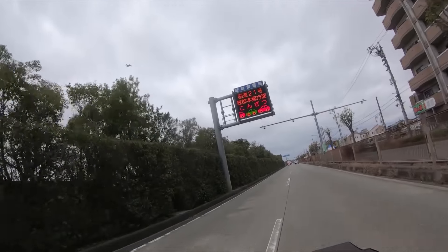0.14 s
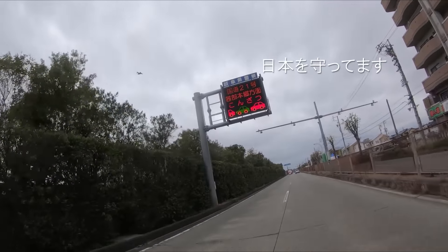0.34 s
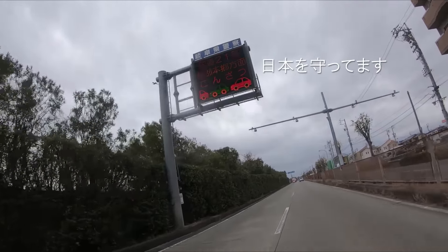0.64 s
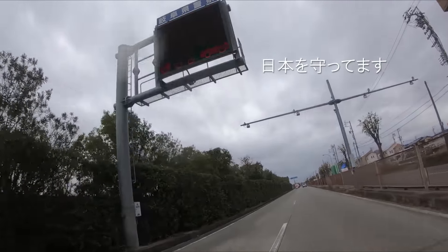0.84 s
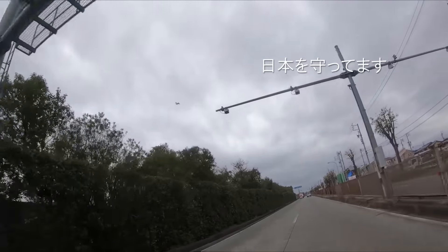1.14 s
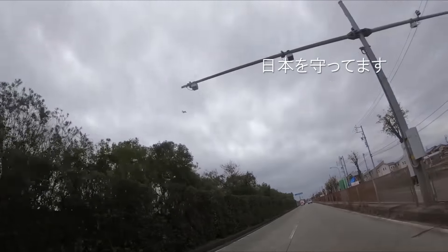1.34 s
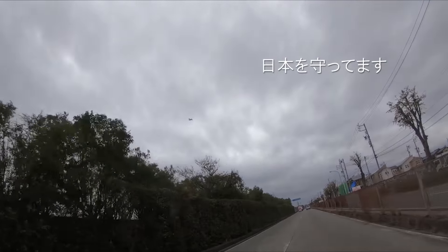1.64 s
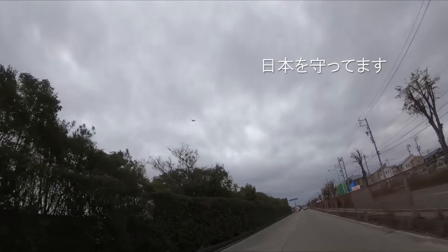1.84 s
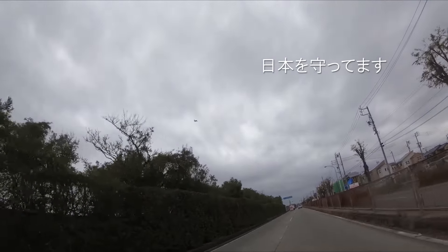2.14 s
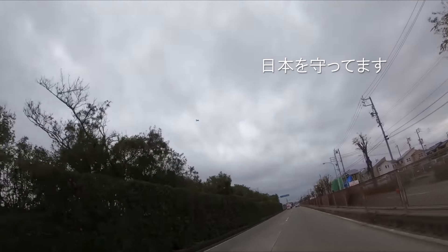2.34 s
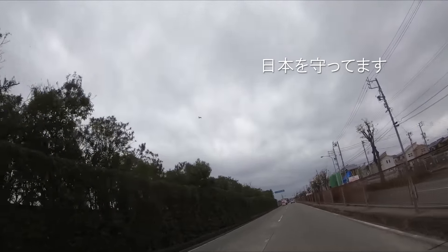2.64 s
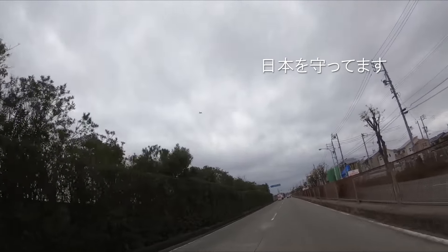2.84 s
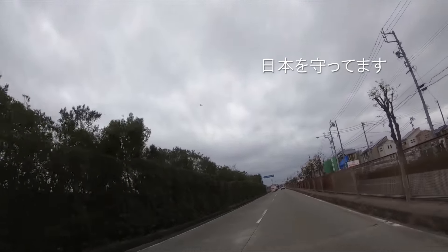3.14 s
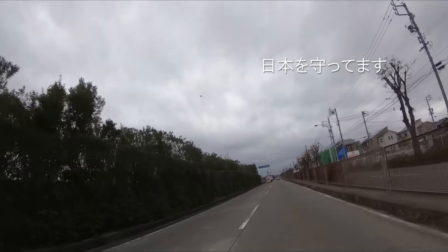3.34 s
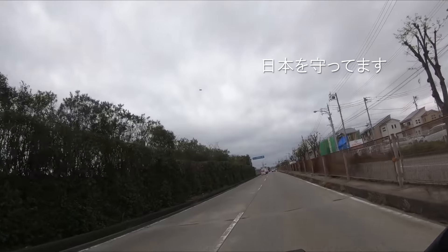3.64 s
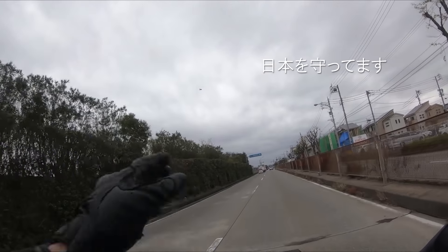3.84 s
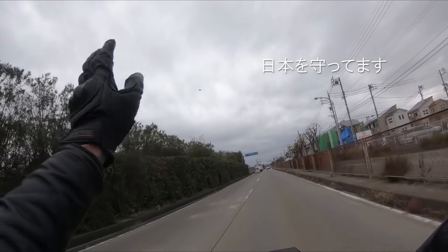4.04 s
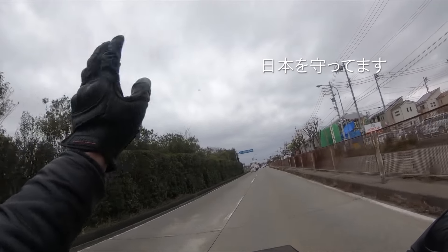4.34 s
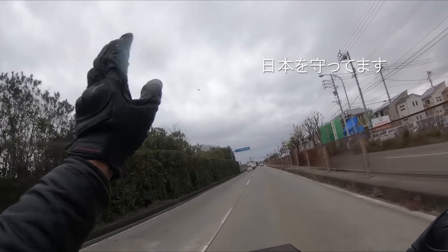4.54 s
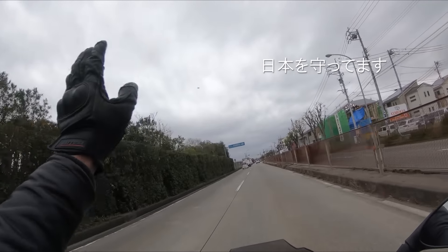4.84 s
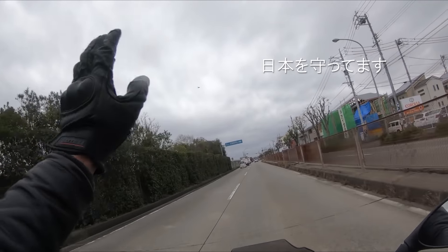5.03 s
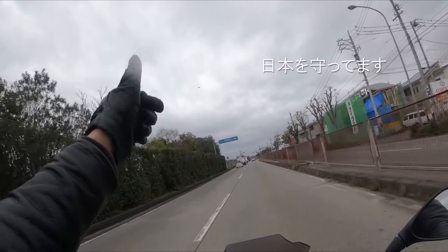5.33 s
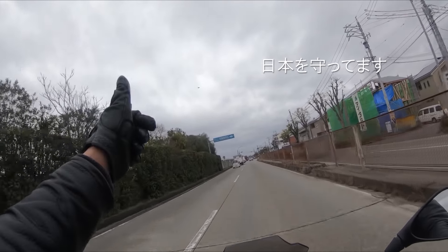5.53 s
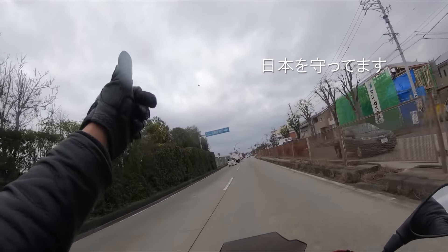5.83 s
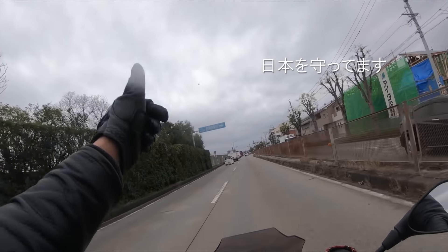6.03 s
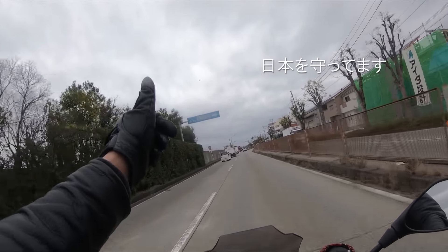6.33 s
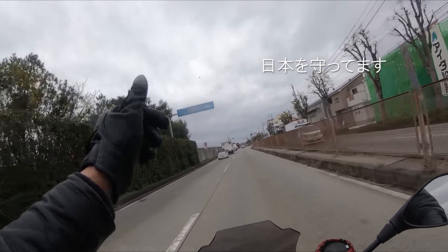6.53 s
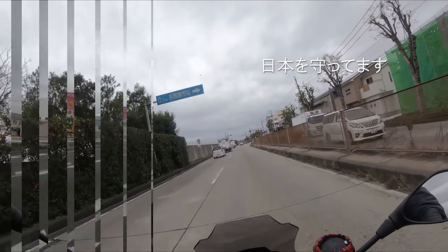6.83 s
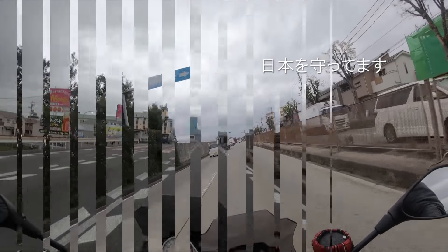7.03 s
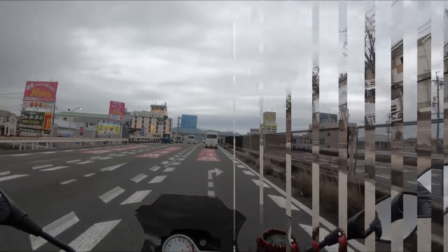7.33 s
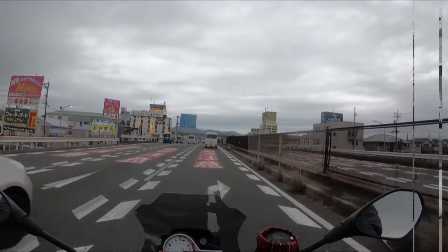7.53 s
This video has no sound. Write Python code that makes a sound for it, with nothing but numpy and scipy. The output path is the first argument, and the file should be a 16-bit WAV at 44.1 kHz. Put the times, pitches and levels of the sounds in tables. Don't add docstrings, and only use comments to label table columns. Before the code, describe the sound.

Heavy jet exhaust roar with a sweeping hollow phasing colour over engine drone and helmet wind, ending suddenly with engine, tyres and wind alone.

```python
import sys
import numpy as np
from scipy import signal
from scipy.fft import rfft, irfft, next_fast_len
from scipy.io import wavfile
from scipy.ndimage import uniform_filter1d, map_coordinates

SR = 44100
rng = np.random.default_rng(int(sys.argv[2]) if len(sys.argv) > 2 else 0)


def generate_wav(signal):
    frames = np.transpose(np.atleast_2d(signal))
    scaled = np.clip(frames, -1, 1) * 32767
    pcm = np.round(scaled).astype(np.int16)
    wavfile.write(sys.argv[1], SR, pcm)


def how_loud(loudness_db):
    steps = np.asarray(loudness_db, float) / 20
    return 10 ** steps


N = 338402
TIME = np.arange(N) / SR


def rms_one(x):
    return x / np.sqrt(np.mean(x ** 2) + 1e-20)


def in_time(rows):
    s, *columns = np.transpose(rows)
    return [np.interp(TIME, s, c) for c in columns]


def at_hz(points, hz):
    point_hz, point_db = np.array(points).T[:2]
    return np.interp(np.log(hz), np.log(point_hz), point_db)


def swing(db):
    return db - db.mean()


def swells(events):
    return sum(db * 2.0 ** -(2 * (TIME - s) / length_s) ** 2 for s, db, length_s in events)


def drift(rate):
    r = np.exp(-80 * np.pi * rate / SR)
    noise = rng.standard_normal(N // 40 + 2002)
    slow = signal.lfilter([1], [1, -2 * r, r * r], noise)[2000:]
    return np.interp(np.arange(N) / 40, np.arange(len(slow)), rms_one(slow))


def bands(spectrum, count):
    size = next_fast_len(N, real=True)
    hz = np.maximum(np.fft.rfftfreq(size, 1 / SR), 1)
    inside = (hz > spectrum[0][0]) * (hz < spectrum[-1][0])
    whole = rfft(rng.standard_normal(size)) * how_loud(at_hz(spectrum, hz)) * inside
    whole = whole / np.sqrt(np.mean(irfft(whole, size) ** 2))
    centres = np.geomspace(spectrum[1][0], spectrum[-3][0], count)
    for k, centre_hz in enumerate(centres):
        share = np.interp(np.log(hz), np.log(centres), np.arange(count) == k)
        yield centre_hz, irfft(whole * share, size)[:N]


def gusty(spectrum, count, shared_db, own_db, rate):
    together = drift(rate)
    total = 0
    for _, band in bands(spectrum, count):
        total = total + band * how_loud(shared_db * together + own_db * drift(rate))
    return rms_one(total)


def gated_band(low_hz, high_hz, gate):
    sos = signal.butter(6, [low_hz, high_hz], "band", fs=SR, output="sos")
    noise = (gate + 1e-18) * rng.standard_normal(N)
    return signal.sosfilt(sos, noise) * np.sqrt(SR / 2 / (high_hz - low_hz))


def bursts(events, gain_db, decay_s, low_hz, high_hz):
    gate = 0
    for s, db in events:
        gate = gate + how_loud(db + gain_db) * np.exp(-np.abs(TIME - s - decay_s) / decay_s)
    return gated_band(low_hz, high_hz, gate)


def echo_of(x, spacing_hz, strength, sway, kind, edge_hz):
    late = np.arange(N) - SR / spacing_hz * (1 + sway * drift(8.6))
    copy = map_coordinates(x, [late], order=3, mode="mirror")
    sos = signal.butter(1, edge_hz, kind, fs=SR, output="sos")
    return np.clip(strength, 0, 1) * signal.sosfilt(sos, copy)


# centre_s, level_db, length_s
GUSTS = [(0.304, -3.5, 0.045), (0.691, 2, 0.2), (1.043, -0.5, 0.063), (1.342, 3.1, 0.064),
         (1.439, 0.5, 0.127), (1.726, 2, 0.26), (1.988, 4.5, 0.05), (2.118, 1, 0.048), (2.297, 1.4, 0.12),
         (2.539, -4.5, 0.086), (2.696, -1, 0.055), (2.851, 2.5, 0.12), (3.023, 4, 0.13),
         (3.218, -0.4, 0.11), (3.347, 1, 0.11), (3.517, -4, 0.072), (3.569, 5, 0.048), (3.954, -1, 0.16),
         (4.213, -2.5, 0.11), (4.31, 1, 0.13), (4.5, -1.5, 0.16), (4.657, -2.5, 0.087), (5.044, 2.5, 0.19),
         (5.742, 4.5, 0.089), (6.021, -7, 0.04), (6.33, -1, 0.15), (6.797, -4, 0.056)]
FLUTTER_DB, FLUTTER_PER_S = 1.35, 12.7


def eddies():
    return swells(GUSTS) + FLUTTER_DB * drift(FLUTTER_PER_S)


# time_s, body_db, top_air_loss_db, body_lean_db_per_octave, top_lean_db_per_octave
ROAR = [(0, -5, 2, -4.5, -1.5), (.4, -3.5, 0.5, 0.5, -1.5), (.9, -0.5, 2.5, 0.1, -2.5),
        (1.6, 0, 4, -0.8, -2), (2.15, 3, 7.5, 0.1, 0), (2.6, 5.5, 7, 9.5, 0.5), (3.0, 3.5, 7.5, -1, -1),
        (3.55, 0.5, 5, -0.2, -1.3), (3.8, -2, 10.5, -9, 2.5), (4.1, 0.5, 9.5, -5.5, 0.5),
        (4.4, 3.5, 8, -2.5, 3.5), (5.0, 0, 8.5, 1, -1), (5.2, 1, 8, 5, -1.5), (5.5, 1, 12, -7, 0.5),
        (6.0, 0.5, 18, 6, 2), (6.5, 0.5, 25, 2.5, -6), (7.19, 0, 21, 3.5, -1)]
# pitch_hz, density_db_per_hz
ROAR_COLOUR = [(65, -32), (110, -6.5), (134, -9.5), (230, 0.5), (276, 1.5), (343, -8), (420, -10),
               (693, -14.5), (1000, -21.5), (1400, -28.5), (1800, -32), (2390, -31.5), (6000, -60),
               (7800, -82), (13200, -120)]
# time_s, comb_spacing_hz, low_strength_0_to_1, high_strength_0_to_1
ROAD_ECHO = [(0, 219.6, 0.3, 0.4), (.5, 217.3, .2, 0.2), (.85, 225.8, .22, .25), (1.3, 227, .3, 0.5),
             (1.7, 242, 0.4, .35), (2.1, 249.3, 0.5, 0.4), (2.6, 257, 0.5, .35), (3.1, 270.8, 0.4, 0.5),
             (3.55, 273, .4, 0.1), (3.85, 285.3, 0.8, 0.2), (4.3, 295, 0.4, .55), (4.7, 303, 0.4, 0.3),
             (5.0, 316, .45, 0.6), (5.35, 321, 0.2, 0.1), (5.9, 332, 0.79, 0.4), (6.4, 328.6, .45, .15),
             (6.8, 332.5, .7, 0), (7.2, 354, 0.6, .15)]
# time_s, comb_spacing_hz, strength_0_to_1
SHOULDER_ECHO = [(0, 494, 0.04), (1.0, 523, 0.1), (2.2, 616, 0), (2.6, 548, 0.2), (4.2, 496, 0),
                 (5.197, 439, 0.29), (7.2, 486, 0)]
# time_s, edge_hz, depth_db, reach_octaves
SHADOW = [(0, 840, -1, 0.7), (.25, 853, -2, 0.79), (.6, 1024, -6.5, 0.92), (1.3, 902, -9, 0.85),
          (2.0, 845, -12, 0.37), (2.6, 870, -15, 0.35), (3.2, 920, -17.5, .45), (3.7, 996, -8, 0.5),
          (4.2, 1035, -1, 0.46), (4.7, 1080, -6.5, 0.95), (5.2, 1195, -15, 0.49), (5.8, 1226, -8.5, 0.48),
          (6.4, 1230, -8, 0.4), (7.2, 1234, -5.5, 0.54)]
# centre_s, level_db, length_s
ROLLS = [(0.407, 3, 0.19), (0.871, 1.5, 0.198), (1.546, -0.5, 0.16), (2.25, 0, 0.34), (2.494, -0.5, 0.2),
         (3.774, -0.5, 0.07), (3.959, 2, 0.15), (4.996, -1.5, 0.15), (5.298, -2, 0.079), (5.989, 1.5, 0.13),
         (6.106, -0.5, 0.16), (6.962, 3.5, 0.1)]
# centre_s, level_db, length_s
MIDDLE_ROLLS = [(1.55, 1, 0.12), (2.8, -2.5, 0.14), (3.95, 0.5, 0.4), (4.78, 0.5, 0.091),
                (5.45, -1.5, 0.27), (6.2, -0.5, 0.91), (7.0, -0.5, 0.11)]
# centre_s, pitch_hz, level_db, length_s
PATCHES = [(.2, 396, -5.5, .7), (1.051, 385, -3, .3), (1.498, 488, 3.5, .5), (1.404, 912, -2.5, 0.55),
           (1.998, 993, -5.5, 0.55), (2.545, 307, 2.5, 0.34), (2.593, 233.6, -3, 0.52),
           (2.615, 373, -8.5, 0.62), (3.75, 397, 10, 0.36), (4.04, 495, -7.5, 0.4), (4.186, 313, -4, .5),
           (3.9, 675, -2, 0.46), (4.09, 795, 3, .8), (4.96, 231, 4.5, .3), (5.286, 863, 4, 0.36),
           (5.846, 880, -7, .9), (5.7, 1092, 5, 0.44), (6.403, 331, -2.5, .35), (6.453, 590, 7, 0.5),
           (6.904, 225, -1, .5), (6.39, 179, -7, .5), (.7, 2650, 3, 1.0), (2.2, 3000, -2.5, 1.4),
           (2.8, 4300, 6, 0.55), (3.45, 3150, 4, .3), (4.0, 1600, -5.5, .5), (5.0, 2500, -3.5, 1),
           (1.2, 2250, 4, .4), (.1, 1350, 3.5, 0.18), (0.59, 540, -2.5, .5), (1.3, 790, 3, .4),
           (1.6, 800, 2.5, .3), (2.4, 235, 3, .2), (3, 170, 2, .5), (3.3, 1650, 2.5, .6),
           (3.0, 4300, 3, .8), (4.7, 690, 3, .2), (5.15, 1000, 3, 0.28), (6.0, 1000, -3.5, .3),
           (6.9, 800, -5.5, .3), (5.4, 260, -1.5, .3), (2.7, 3300, -3, .4), (6.7, 420, -2, .5),
           (4.5, 500, -2.5, .2)]
PATCH_OCTAVES = 0.12
BODY_CLIMB_DB = 16.5
MIDDLE_LOSS_SHARE = 0.33
DUCK_MIDDLE = 0.25
TOP_FOLLOWS = 0.88
LOWS_LATE = 1.007


def roar_patches(hz):
    events = []
    for s, at_pitch_hz, db, length_s in PATCHES:
        if .7 < hz / at_pitch_hz < 1.4:
            nearness = np.exp(-(np.log2(hz / at_pitch_hz) / PATCH_OCTAVES) ** 2)
            events.append((s, db * nearness, length_s))
    return swells(events)


def jet(eddies_db):
    body_db, loss_db, lean_db, bright_db = in_time(ROAR)
    body_db, loss_db = swing(body_db), swing(loss_db)
    middle_db = -MIDDLE_LOSS_SHARE * loss_db - DUCK_MIDDLE * body_db + swells(MIDDLE_ROLLS)
    top_db = TOP_FOLLOWS * eddies_db - loss_db
    body_db = body_db + swells(ROLLS)
    edge_hz, depth_db, reach = in_time(SHADOW)
    spacing_hz, low_echo, high_echo = in_time(ROAD_ECHO)
    climb = np.log2(spacing_hz / 270)
    lows, highs = 0, 0
    for hz, band in bands(ROAR_COLOUR, count=30):
        above = np.log2(hz / edge_hz)
        top = np.clip(above / .12 + 1, 0, 1)
        body = np.clip((np.log2(480 / hz) + climb) / .54, 0, 1)
        middle = (1 - top) * (1 - body)
        tilted_body_db = body_db + (BODY_CLIMB_DB * climb + lean_db) * np.log2(hz / 270)
        tilted_top_db = top_db + bright_db * np.log2(hz / 1700)
        level_db = body * tilted_body_db + middle * middle_db + top * tilted_top_db
        shade_db = top * depth_db * np.exp(-(above / np.maximum(reach, .1)) ** 2)
        flicker_db = (0.66 + 0.32 * top) * drift(8.9)
        band = band * how_loud(level_db + shade_db + roar_patches(hz) + flicker_db)
        lows = lows + (1 - top) * band
        highs = highs + top * band
    low_spacing_hz = spacing_hz / LOWS_LATE
    bounce = echo_of(lows, low_spacing_hz, low_echo, 0.0097, "low", 3000)
    again = 0.3 * echo_of(bounce, low_spacing_hz, low_echo, .003, "low", 2000)
    high_bounce = echo_of(highs, spacing_hz * 1.012, high_echo, 0.004, "low", 4500)
    out = lows + bounce + again + highs + high_bounce
    out = out + echo_of(out, *in_time(SHOULDER_ECHO), 0.073, "high", 1200)
    return how_loud(-11.5) * rms_one(out)


# pitch_hz, density_db_per_hz
HISS = [(900, -15), (1300, 1.5), (1500, 1.5), (1640, -3.5), (2300, -0.5), (2550, -3.5), (3200, -6.5),
        (4800, -9), (5700, -14), (6800, -18), (8200, -21.5), (9400, -30), (11000, -56.5), (13000, -89.5)]
# centre_s, level_db, length_s
SURGES = [
    (0.0, 1, .15),
    (.6, -2, 0.42),
    (3.15, 1.5, 0.83),
    (5.3, 0, 1.0),
    (6.6, 1.5, 0.46),
]
HISS_DB, HISS_RISE_DB_PER_S = -43.5, 1
DUCK_HISS = 0.44
HISS_FOLLOWS = 0.55


def hiss(eddies_db):
    gain_db = swing(HISS_RISE_DB_PER_S * TIME - DUCK_HISS * in_time(ROAR)[0])
    level_db = HISS_DB + gain_db + HISS_FOLLOWS * eddies_db + swells(SURGES)
    return how_loud(level_db) * gusty(HISS, count=8, shared_db=0.97, own_db=0.5, rate=43.0)


# pitch_hz, width_hz, share
CAVITIES = [(3740, 110, -0.33), (3790, 90, 0.46), (4240, 330, -0.0084), (4770, 190, 0.47),
            (5210, 380, -0.14), (6450, 150, .4), (8000, 400, 0.24)]


def vents(sound):
    out = sound
    for hz, width_hz, share in CAVITIES:
        r = np.exp(-np.pi * min(width_hz, 500) / SR)
        peak = [(1 - r * r) / 2, 0, (r * r - 1) / 2]
        ring = [1, -2 * r * np.cos(2 * np.pi * hz / SR), r * r]
        out = out + share * signal.lfilter(peak, ring, sound)
    return out


def firing_orders(firing_hz, level_db, orders, rough_db):
    turn = 2 * np.pi * np.cumsum(firing_hz * (1 + 0.00524 * drift(3.34))) / SR
    firing_db = dict(orders)[1]
    lines = 0
    for k, db in orders:
        phase = 1.28 * rng.standard_normal()
        lines = lines - how_loud(db - firing_db + rough_db * drift(9.0)) * np.cos(k * turn + phase)
    return np.sqrt(2) * how_loud(level_db) * lines


# time_s, firing_hz, firing_line_db
ENGINE = [(0, 91.58, -21.5), (3.1, 90.53, -25), (3.4, 91.74, -22.5), (5.5, 92.74, -23.5), (7.2, 91.68, -22)]
# multiple_of_firing, level_db
ENGINE_ORDERS = [(.5, -9), (1, 5.5), (1.5, -21.5), (2, 2), (2.5, -4.5), (3, -8.5), (4, -5), (5, -6)]


def engine():
    return firing_orders(*in_time(ENGINE), ENGINE_ORDERS, rough_db=2.5)


# pitch_hz, density_db_per_hz
BUFFET = [(8.2, -35), (14, -15), (59, -6), (86, -7.5), (99, -9.5), (128, -11), (170, -8.5), (220, -26.5),
          (370, -120)]


def wind(buffet_db):
    return how_loud(buffet_db + 1.5) * gusty(BUFFET, count=4, shared_db=.8, own_db=.8, rate=6.0)


# centre_s, level_db, length_s
WIND = [(0.389, -19, 0.073), (0.711, -11, 0.12), (0.935, 2, 0.2), (1.664, 1, 0.2), (2.103, 2, 0.12),
        (2.325, -1.5, 0.171), (2.691, 3, 0.34), (3.108, -5.5, 0.27), (3.425, 4.5, 0.49), (4.278, -2, 0.36),
        (4.697, 4.5, 0.084), (4.944, 3.5, 0.15), (5.632, -0.5, 0.33), (5.767, -0.5, 0.14), (6.054, 0, 0.3),
        (6.665, 0, 0.16)]
BUFFET_DB, BUFFET_RISE_DB_PER_S = -24.5, 0.41


def buffeting():
    return wind(BUFFET_DB + BUFFET_RISE_DB_PER_S * TIME + swells(WIND))


# time_s, level_db
AIR = [(0, -84), (.5, -88), (2.6, -91), (3.5, -88), (3.85, -85.5), (5.4, -85.5), (6.5, -81.5), (7.15, -81),
       (7.25, -80), (7.68, -74)]
CEILING_HZ = [12000, 12700, 13400]


def slipstream():
    air_db = in_time(AIR)[0]
    air = gated_band(9900, 12000, how_loud(air_db + 1.2 * drift(12.0)))
    reach = drift(5.0) + TIME / 2.8 - 1.2
    for k, (low_hz, high_hz) in enumerate(zip(CEILING_HZ, CEILING_HZ[1:])):
        is_open = np.clip(4 * (reach - 1.2 * k), 0, 1)
        air = air + gated_band(low_hz, high_hz, how_loud(air_db - 11.0) * is_open)
    return air


# start_s, peak_db
SPITS = [(0.21, -72.5), (1.025, -68), (1.728, -63), (1.9016, -73.5), (4.1903, -61), (4.344, -65),
         (4.8196, -71), (5.1973, -61.5), (5.224, -53), (5.2976, -66), (5.672, -69.5), (6.3016, -67.5),
         (6.576, -70), (7.2988, -74), (7.3894, -72.5), (7.4903, -68), (7.6394, -66)]


def grit():
    return bursts(SPITS, -9.0, .008, 9500, 15700)


# time_s, pitch_hz, level_db
WHINE = [
    (.4, 1738, -37),
    (.9, 1790, -34),
    (1.6, 1852, -36),
    (2.2, 1835, -34),
    (2.8, 1812, -40.5),
    (3.3, 1746, -60),
]


def whine():
    hz, db = in_time(WHINE)
    sos = signal.butter(2, 120, fs=SR, output="sos")
    wide = signal.sosfilt(sos, rng.standard_normal((2, N)))
    turn = 2 * np.pi * np.cumsum(hz) / SR
    heard = (TIME > WHINE[0][0]) * (TIME < WHINE[-1][0])
    ridge = how_loud(db) * heard * rms_one(wide[0] * np.cos(turn) + wide[1] * np.sin(turn))
    spacing_hz, _, high_echo = in_time(ROAD_ECHO)
    return ridge + 1.8 * echo_of(ridge, spacing_hz, high_echo, 0.0036, "low", 6000)


# start_s, peak_db
TICKS = [(1.217, -47), (1.3887, -30.5), (1.7268, -27.5), (1.868, -36), (2.2817, -33), (2.9892, -29),
         (3.0693, -36), (3.5697, -40), (4.4456, -27), (5.22, -55)]


def strap():
    return bursts(TICKS, -12.5, 0.0013, 3500, 7900)


# time_s, firing_hz, firing_line_db, buffet_db, tyre_and_wind_db
LATER = [
    (7.19, 96, -21, -23, -30.5),
    (7.38, 95.8, -22, -19, -30.5),
    (7.55, 95.8, -21, -23, -30.5),
    (7.68, 96, -20, -23, -30.5),
]
# multiple_of_firing, level_db
LATER_ORDERS = [(0.5, -6), (1, 0), (1.5, -14), (2, -8.5), (2.5, -8), (3, -3.5), (3.5, -17), (4, -9),
                (4.5, -25), (5, -15), (5.5, -25), (6, -26), (6.5, -23.5), (7, -18), (7.5, -22.5), (8, -27)]
# pitch_hz, density_db_per_hz
LATER_COLOUR = [(14, -30), (28, 11), (70, -0.5), (125, -4), (300, -4), (420, -9.5), (560, -14.5),
                (680, -15), (1050, -18), (2480, -24), (5140, -34.5), (9380, -56.5), (12200, -98),
                (20600, -120)]


def second_road():
    firing_hz, line_db, buffet_db, tyre_db = in_time(LATER)
    tyres = gusty(LATER_COLOUR, count=12, shared_db=.3, own_db=.4, rate=21.0)
    drone = firing_orders(firing_hz, line_db, LATER_ORDERS, rough_db=2.0)
    return drone + wind(buffet_db + 2.0) + how_loud(tyre_db + 12.5) * tyres


MIC_TOP_HZ = 9200


def limit(x, squeeze=0.21):
    level = np.sqrt(uniform_filter1d(x ** 2, size=441) + 1e-4)
    x = np.tanh(x * (level / 0.24) ** -squeeze)
    return signal.sosfilt(signal.butter(8, MIC_TOP_HZ, fs=SR, output="sos"), x)


SPLICE_S, SPLICE_JUMP = 7.19302, -.25


def splice(first, second):
    cut = round(SPLICE_S * SR)
    near = np.exp(-np.abs(np.arange(N) - cut) / (.001 * SR))
    first = first - near * (first[cut] + SPLICE_JUMP / 2)
    second = second - near * (second[cut] - SPLICE_JUMP / 2)
    return np.where(np.arange(N) < cut, first, second)


def scene():
    eddies_db = eddies()
    first = vents(jet(eddies_db) + hiss(eddies_db)) + whine() + engine() + buffeting()
    ride = splice(limit(first), limit(second_road()))
    end_fade = np.clip(TIME[::-1] / .0002, 0, 1)
    return ride[None] * end_fade + slipstream() + grit() + strap()


def low_pass(x):
    return signal.sosfilt(signal.butter(12, 15720, fs=SR, output="sos"), x)


def record(dry):
    return low_pass(dry)


dry = scene()
out = record(dry)
generate_wav(out)
```